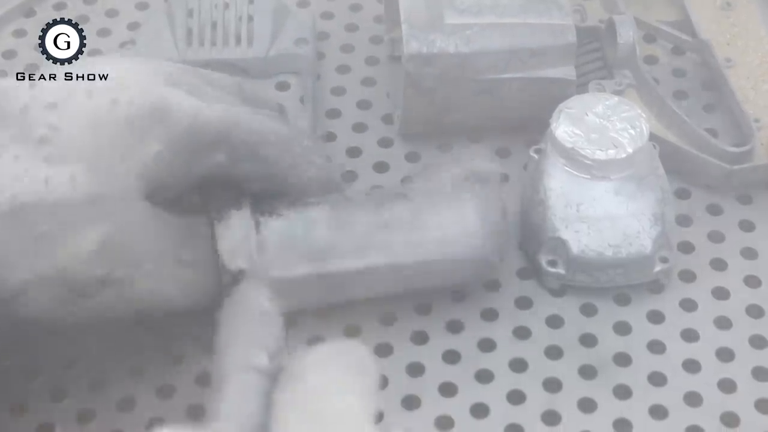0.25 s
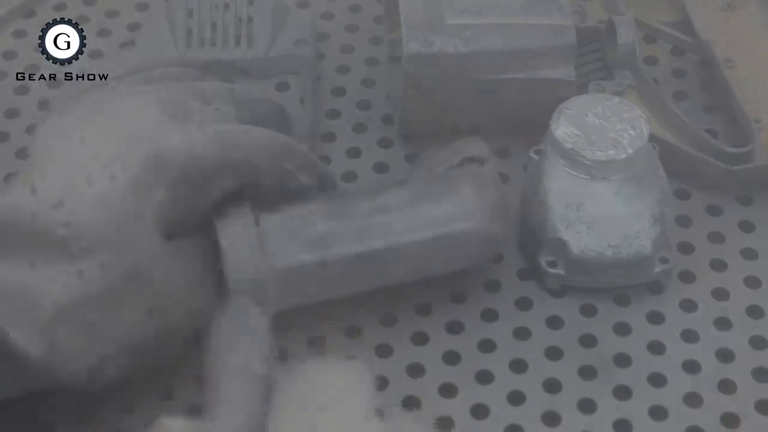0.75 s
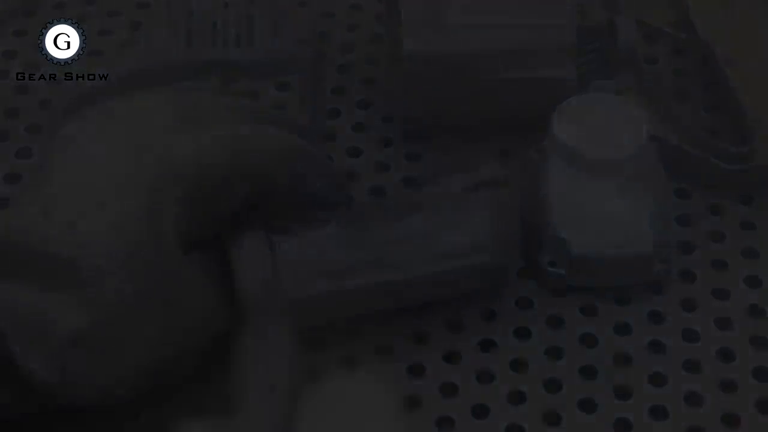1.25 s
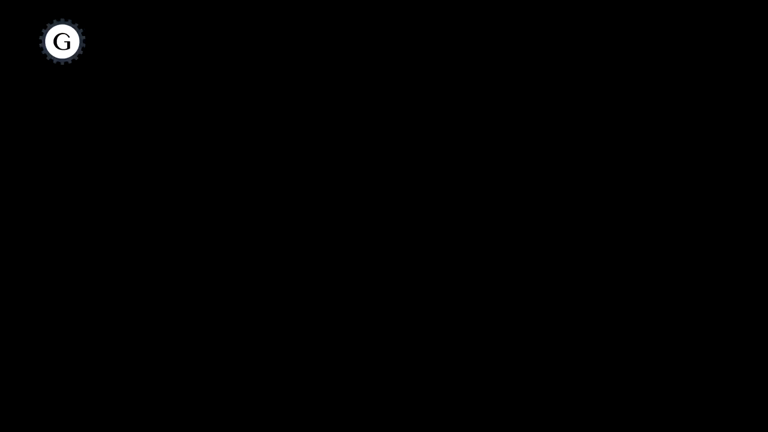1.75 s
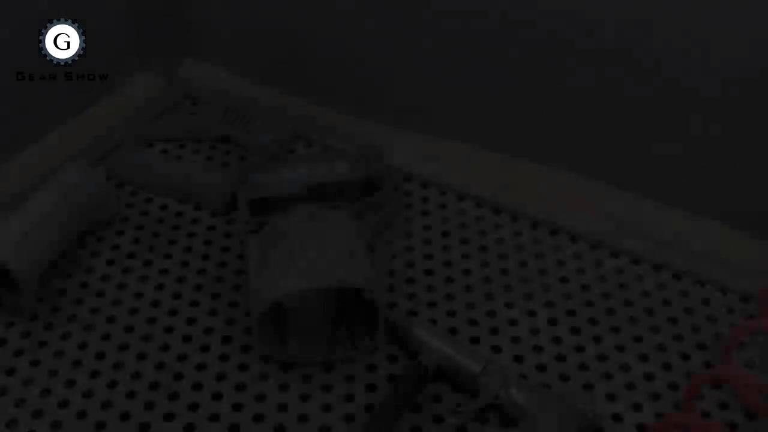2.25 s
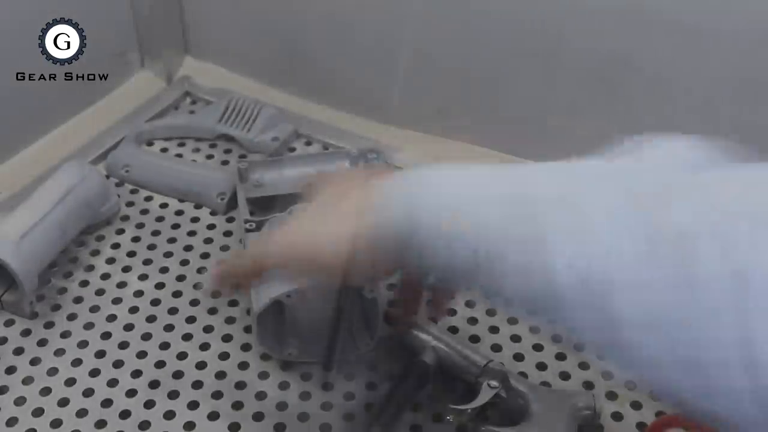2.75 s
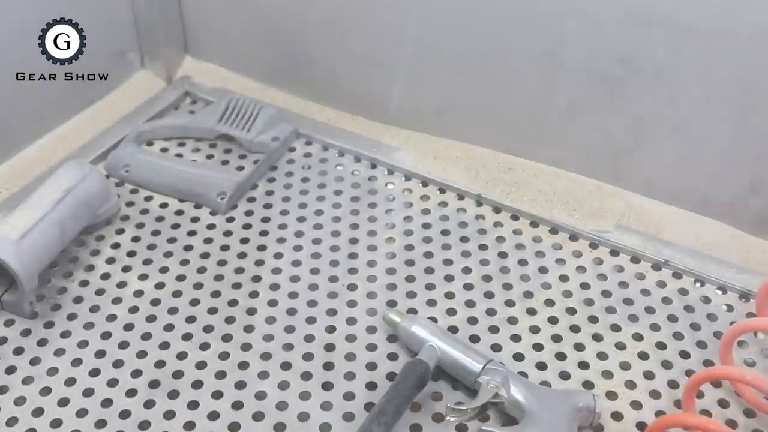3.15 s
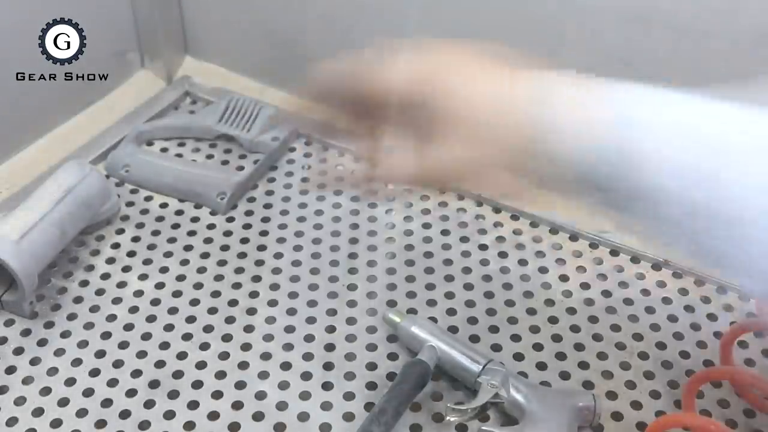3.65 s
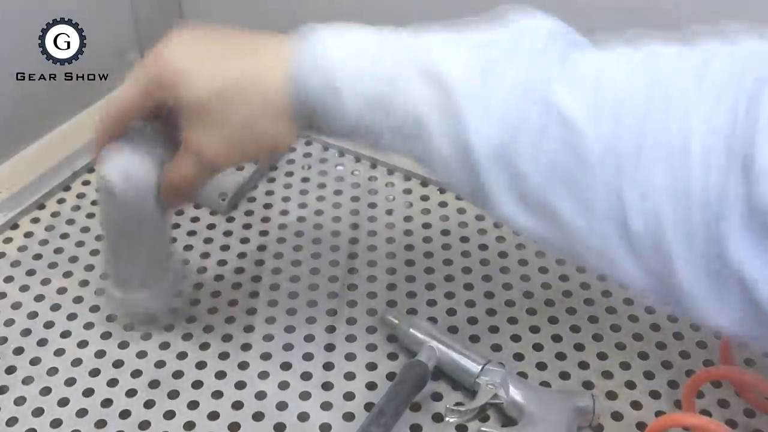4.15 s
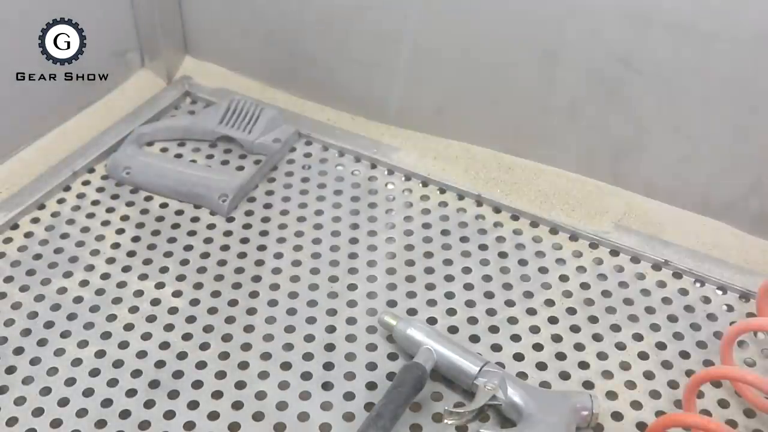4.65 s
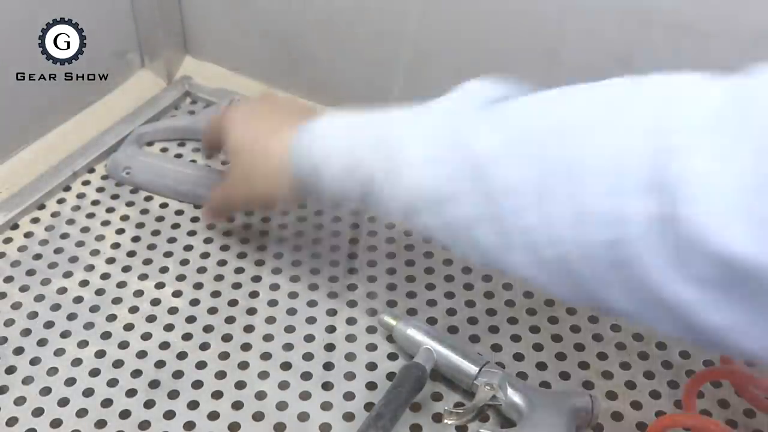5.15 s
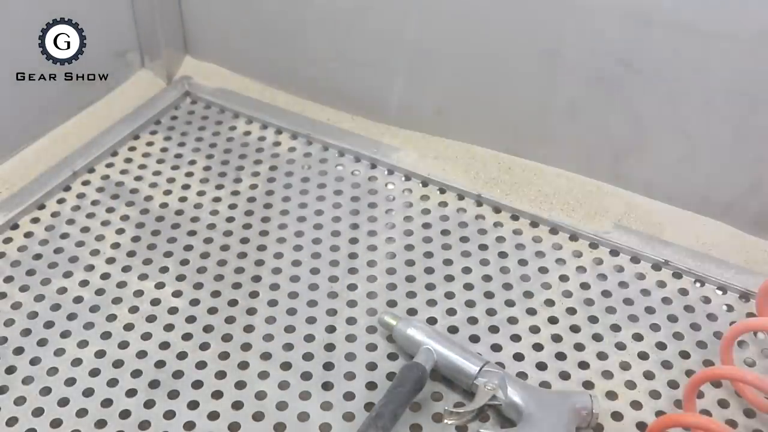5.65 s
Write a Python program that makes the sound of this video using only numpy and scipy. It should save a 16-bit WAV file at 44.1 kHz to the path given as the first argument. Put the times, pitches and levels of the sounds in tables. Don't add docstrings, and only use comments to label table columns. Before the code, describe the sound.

Inside a steel blasting cabinet, a turbulent air jet roars with bright hissing grit, wavering hollow hums and thin whistle spurts. It fades to near silence by two seconds. A quiet, hard-walled shop fades in, and metal parts clank off a perforated grate and onto a bench, one heavy knock early, a ringing tube later. One close microphone, identical in both channels.

```python
import sys
import numpy as np
from scipy import signal
from scipy.fft import rfft, irfft, next_fast_len
from scipy.io import wavfile
from scipy.ndimage import uniform_filter1d

SR = 44100
rng = np.random.default_rng(int(sys.argv[2]) if len(sys.argv) > 2 else 0)


def linear_from_db(decibels):
    return 10 ** (np.asarray(decibels, float) / 20)


def materialize(psi):
    bounded = np.clip(np.atleast_2d(psi).T, -1, 1)
    quanta = np.round(bounded * 32767).astype(np.int16)
    wavfile.write(sys.argv[1], SR, quanta)


N = 260615
SIZE = next_fast_len(N)
CUT_S = 1.917


def rms_one(x):
    return x / np.sqrt(np.mean(x ** 2) + 1e-20)


def in_time(rows):
    s, *columns = np.transpose(rows)
    return [np.interp(np.arange(N) / SR, s, c, left=-120, right=-120) for c in columns]


def at_hz(points, hz):
    table_hz, value = np.transpose(points)
    return np.interp(np.log(hz), np.log(table_hz), value)


def ramp(start_s, length_s):
    return np.clip((np.arange(N) / SR - start_s) / length_s, 0, 1)


def swells(rows):
    t = np.arange(N) / SR
    return np.max([db * np.exp(-(2 * (t - s) / length) ** 4) for s, length, db in rows], axis=0)


def drift(rate):
    r = np.exp(-80 * np.pi * rate / SR)
    slow = signal.lfilter([1], [1, -2 * r, r * r], rng.standard_normal(N // 40 + 2002))[2000:]
    return np.interp(np.arange(N) / 40, np.arange(len(slow)), rms_one(slow))


def band(x, low_hz, high_hz):
    return signal.sosfilt(signal.butter(3, [low_hz, min(high_hz, SR * .45)], "band", fs=SR, output="sos"), x)


def resonance(x, hz, width_hz):
    r = np.exp(-np.pi * width_hz / SR)
    return signal.lfilter([(1 - r * r) / 2, 0, (r * r - 1) / 2], [1, -2 * r * np.cos(2 * np.pi * hz / SR), r * r], x)


def coloured(x, spectrum):
    hz = np.maximum(np.fft.rfftfreq(SIZE, 1 / SR), 1)
    return rms_one(irfft(rfft(x, SIZE) * linear_from_db(at_hz(spectrum, hz)), SIZE)[:N])


def patchy(x, patchy_db, rate):
    together, spectrum = drift(rate / 4), rfft(x, SIZE)
    octave = np.log2(np.maximum(np.fft.rfftfreq(SIZE, 1 / SR), 1) / 22)
    out = np.zeros(N)
    for k in range(11):
        share = np.cos(np.pi / 2 * np.clip(octave - k, -1, 1)) ** 2
        out += irfft(spectrum * share, SIZE)[:N] * linear_from_db(patchy_db * (0.11 * together + drift(rate)))
    return rms_one(out)


def rattle(blows, spread_s):
    out, t = np.full(N + 4000, 1e-18), np.arange(4000) / SR
    draws = rng.standard_normal((len(blows), 4000)) ** 3
    for (s, db), draw in zip(blows, draws):
        spectrum = rfft(draw * t * np.exp(-t / spread_s))
        run = irfft(spectrum / np.abs(spectrum) ** .8)
        run = run * np.exp(-t / (4 * spread_s))
        start = round(s * SR)
        out[start:start + 4000] += linear_from_db(db) * run / np.sqrt(np.sum(run ** 2))
    return out[:N]


# t/s, level/dB
MACHINERY = [
    (1.9, -57),
    (2.8, -54),
    (3.3, -57.5),
    (4.6, -53),
    (5.2, -57),
    (5.92, -59),
]
# f/Hz, density/dB per Hz
SHOP_SPECTRUM = [(15, -29), (25, -10.5), (101, -19), (160, -6), (247, -2.5), (434, -3), (471, -8),
                 (510, -1.5), (829, -8.5), (948, -8), (1380, -10.5), (15600, -29)]


def shop():
    door_s, swing_s, door_loss_db = 2.22, .12, -11.5
    machinery_db, = in_time(MACHINERY)
    hiss_db = -56 + door_loss_db * (1 - ramp(door_s - swing_s / 2, swing_s))
    air = patchy(coloured(rng.standard_normal(N), SHOP_SPECTRUM), patchy_db=1.0, rate=8.8)
    hum = signal.lfilter([.15], [1, -.85], air)
    fade_in = ramp(CUT_S, 0.38) ** 0.73
    return fade_in * (linear_from_db(machinery_db) * hum + linear_from_db(hiss_db) * (air - hum))


# f/Hz, density/dB per Hz
ROAR_SPECTRUM = [(18, -78), (30, -57), (109, -30), (216, -4), (585, -3), (639, -3.5), (699, -1), (834, -5),
                 (953, -2.5), (1060, -3.5), (2020, -10), (2420, -13.5), (3300, -16), (6000, -42),
                 (7800, -50), (13200, -120)]
# f/Hz,
# width/Hz, level over the roar/dB
SHAKEN_PANELS = [(307, 32, -14), (1159, 3.5, -13.5), (2024, 28, -16.5), (2775, 83, -18), (3206, 350, -17),
                 (3830, 37, -25.5), (4910, 220, -24.5), (6510, 230, -28), (11800, 73, -40),
                 (13420, 60, -38)]


def roar():
    turbulence, push = rng.standard_normal((2, N))
    out = patchy(coloured(turbulence, ROAR_SPECTRUM), patchy_db=1.65, rate=1.5)
    for hz, width_hz, db in SHAKEN_PANELS:
        out = out + linear_from_db(db + 1.65 * drift(6.4)) * rms_one(resonance(push, hz, width_hz))
    return linear_from_db(-28) * out


def cabinet(x):
    t60_s, echo_db = 0.13, -3.0
    t = np.arange(SR // 5) / SR
    echoes = rng.standard_normal(len(t)) * linear_from_db(-60 * t / t60_s)
    echoes = echoes / np.sqrt(np.sum(echoes ** 2))
    return rms_one(x + linear_from_db(echo_db) * signal.fftconvolve(x, echoes)[:N])


# f/Hz, density/dB per Hz
GRIT_SPECTRUM = [(1470, -59), (2500, -7), (3170, -5), (3580, -6), (5670, -10), (8850, -8.5), (13700, -16),
                 (15600, -21.5)]


def grit(air):
    flows_s, rise_s, thin_db = 0.393, 0.037, -4.5
    struck = rng.random(N) < 9000 / SR
    hail = struck * linear_from_db(13.0 * np.minimum(rng.exponential(1, N), 4)) * rng.choice([-1, 1], N)
    hiss = coloured(rms_one(hail) * 0.21 + air, GRIT_SPECTRUM)
    hiss = cabinet(patchy(hiss, patchy_db=0.06, rate=6.4))
    return linear_from_db(-34 + thin_db * (1 - ramp(flows_s, rise_s))) * hiss


def air_column(white, hz, width_hz):
    tone = resonance(resonance(white, hz, width_hz), hz, width_hz)
    return rms_one(tone / uniform_filter1d(tone ** 2 + 1e-20, 600) ** .35)


# f/Hz, width/Hz, resting level/dB, share of the gain
AIR_COLUMNS = [
    (634, 10.2, -44.5, 0.8),
    (955, 44, -38, 0.24),
    (4470, 12, -51, 0.66),
    (8820, 60, -61, 1.2),
]
# middle t/s, length t/s, gain level/dB
MOUTH_SWEEPS = [
    (.09, .06, 12),
    (.22, 0.21, 15.5),
    (.34, 0.18, 18),
    (.51, .13, 17),
    (.69, 0.16, 4),
    (1.055, 0.056, 15),
    (1.14, 0.037, 14),
    (1.25, 0.11, 9.5),
    (1.55, 0.37, 13.5),
    (1.8, 0.26, 13),
]
# middle t/s, length t/s, gain level/dB
WHISTLE_SPURTS = [
    (.055, .08, 7.5),
    (.16, 0.1, 8),
    (.29, .11, 12),
    (.5, 0.087, 6),
    (.9, .12, 3),
    (1.3, .12, 9),
    (1.6, .12, 8),
]


def blown_air(air):
    hum_db, whistle_db = swells(MOUTH_SWEEPS), swells(WHISTLE_SPURTS)
    gains_db = [hum_db, hum_db, whistle_db, whistle_db]
    return sum(linear_from_db(db + share * gain_db) * air_column(air, hz, width_hz)
               for gain_db, (hz, width_hz, db, share) in zip(gains_db, AIR_COLUMNS))


def jet():
    air = rng.standard_normal(N)
    fade_out = ramp(CUT_S, -1.13) ** 0.89
    return fade_out * (roar() + grit(air) + blown_air(air))


def thump():
    t = np.maximum(np.arange(N) / SR - 2.405, 0)
    return linear_from_db(-44) * np.sin(2 * np.pi * 35 * t) * np.exp(-t / .015)


# t/s, first level/dB, first ring f/Hz, second level/dB, second ring f/Hz
GRIT_TICKS = [(2.848, -53, 6540, -49.5, 3000), (2.945, -63, 8000, -64, 13170),
              (3.17, -45, 14500, -56, 8000), (3.178, -53.5, 2790, -69, 5640), (3.58, -66, 8000, -55, 2300),
              (3.665, -62, 5000, -52, 2500), (3.776, -50, 8400, -50, 3500),
              (4.173, -45.5, 16000, -59, 8300), (4.3, -50, 5800, -58, 13500), (4.61, -58, 7960, -57, 4900),
              (4.974, -67, 12000, -62, 7400), (5.538, -53, 13300, -61, 8000), (5.605, -66, 7000, -55, 3550)]


def ticks():
    out = np.zeros(N)
    for s, db, hz, second_db, second_hz in GRIT_TICKS:
        run = rattle([(s - .002, 36)], spread_s=0.0068)
        out += linear_from_db(db) * resonance(run, hz, 0.37 * hz)
        out += linear_from_db(second_db) * resonance(run, second_hz, 0.27 * second_hz)
    return out


# t/s, peak level/dB
BENCH_SNAPS = [
    (4.767, -25),
    (4.778, -16),
    (5.8922, -13),
]


def snaps():
    clicks = np.full(N, 1e-18)
    for s, db in BENCH_SNAPS:
        clicks[round(s * SR)] = linear_from_db(db + 15.5)
    return resonance(clicks, 2600, 1700)


# t/s, strength level/dB, weight on the grate level/dB, hardness level/dB
METAL_KNOCKS = [(2.173, -48.5, 11.5, -10), (2.209, -37, 6.5, -9.5), (2.229, -52, -3, 4.5),
                (2.397, -27, 5, 4.5), (2.41, -8.5, -12, -6), (2.965, -45, 2.5, -13), (3.993, -41, 12, -18),
                (4.06, -39.5, 4.5, -16.5), (4.18, -24, 4.5, -14.5), (4.257, -23, 5.5, -17),
                (4.329, -26, -3.5, -15.5), (4.767, -24.5, -43, -26), (4.778, -29, -23, -11),
                (5.044, -47.5, 1, -11), (5.099, -48, 2.5, -11), (5.315, -40, 9.5, -8.5),
                (5.359, -40, -16, -12), (5.893, -26.5, -29, -15)]
IMPACT_EDGES_HZ = [170, 800, 2500, 4800, 17000]


def knocks():
    s, db, weight_db, hard_db = np.transpose(METAL_KNOCKS)
    crack_db = db - 0.5 + 0.033 * hard_db
    levels_db = [db + weight_db, db, crack_db, db + hard_db]
    spreads_s, lifts_db = [0.0123, 0.0054, 0.0048, 0.0093], [35.1, 32.3, 28.4, 34.3]
    out = np.zeros(N)
    for k, (low_hz, high_hz) in enumerate(zip(IMPACT_EDGES_HZ, IMPACT_EDGES_HZ[1:])):
        blows = np.c_[s - .003, levels_db[k] + lifts_db[k]]
        out += band(rattle(blows, spreads_s[k]), low_hz, high_hz)
    return signal.sosfilt(signal.butter(1, 8000, fs=SR, output="sos"), out)


# f/Hz, T60/s
SHOP_T60 = [(150, 0.78), (400, 0.53), (1040, 0.5), (2760, 0.55), (7280, 0.37), (11000, 0.37), (16000, 0.1)]


def room(noisy):
    direct_db, build_s = -7, 0.0028
    t, edges = np.arange(SR // 2) / SR, 80 * 2 ** np.arange(0, 8.1, .5)
    white = rng.standard_normal((2, len(t)))
    tail = np.zeros(len(t))
    for k, (low_hz, high_hz) in enumerate(zip(edges, edges[1:])):
        t60_s = 0.83 * at_hz(SHOP_T60, np.sqrt(low_hz * high_hz))
        tail += band(white[k % 2], low_hz, high_hz) * linear_from_db(-60 * t / t60_s)
    tail = tail * (1 - np.exp(-t / build_s))
    tail = tail / np.sqrt(np.sum(tail ** 2))
    return linear_from_db(direct_db) * noisy + signal.fftconvolve(noisy, tail)[:N]


def part(modes, blows, swell_s, waver):
    at, out = [round(s * SR) for s, db in blows], np.zeros(N)
    start, swell = at[0], np.exp(-1 / (swell_s * SR))
    t, blow_db = np.arange(N - start) / SR, np.array(blows)[:, 1]
    softness_db = blow_db.max() - blow_db
    for hz, db, t60 in modes:
        dulling_db = 0.2 * softness_db * max(np.log2(hz / 1500), 0)
        energy = np.full(N, 1e-30)
        energy[at] = linear_from_db(2 * (blow_db + db - dulling_db + rng.normal(0, 1.5, len(at))))
        swell_and_decay = np.convolve([1, -swell], [1, -linear_from_db(-120 / (t60 * SR))])
        energy = signal.lfilter([1 - swell], swell_and_decay, energy[start:])
        wander = waver * drift(21.2)[start:]
        tone = np.sin(2 * np.pi * (hz * t + rng.random()) + wander)
        out[start:] += np.sqrt(energy) * linear_from_db(5.1 * wander[::-1]) * tone
    return out


# t/s, level/dB
GRATE_MODES = [(222.2, -4.5, 0.26), (272.5, -6.5, 0.44), (319.4, 3, 0.4), (405, -17, 0.025),
               (485, -1.5, 0.41), (506, -5, 0.15), (592, -20.5, 0.29), (678, 1.5, 0.1)]
GRATE_HITS = [(2.226, -39.5), (2.29, -59), (2.411, -30.5), (2.965, -49.5), (4.0, -62), (4.062, -41),
              (4.193, -33), (4.26, -33.5), (4.334, -35), (5.311, -47), (5.37, -54)]
LUG_MODES = [(780, 0, 0.093), (1000, 6, 0.063), (1138, 0, .08), (2900, -8, .06)]
LUG_HITS = [
    (2.176, -43.5),
    (2.85, -69),
    (3.99, -51),
]
HOUSING_MODES = [(214, -17, 0.71), (260, -7.5, 0.43), (1710, -10.5, 0.47), (579, -6.5, 0.37),
                 (1412, -3, 0.29), (1910, -14, 0.38), (2185, -8.5, 0.36), (5350, -10, 0.39),
                 (5800, -17.5, 0.38), (6360, -22, 0.187), (7070, -18, 0.3), (8080, -8, 0.17),
                 (9905, -19, .16)]
HOUSING_HITS = [
    (2.41, -16),
]
BRACKET_MODES = [(655, -11.5, 0.203), (1400, -4, 0.5), (2220, 3, 0.039), (3000, -4, 0.17), (3500, 3, .15),
                 (3910, 3, 0.18), (5230, -2, 0.061), (7540, -2, 0.15), (11800, -28, 0.1)]
BRACKET_HITS = [
    (2.962, -54.5),
    (2.99, -51.5),
    (5.892, -35),
]
SLEEVE_MODES = [(3060, 1, 0.23), (3520, 0.5, 0.2), (4430, -5, 0.18), (6080, -6, .15), (7040, -14, 0.27),
                (7470, -17, .22), (7955, -12, 0.41), (8270, -11, .25), (8500, -6.5, 0.22),
                (9060, -12, 0.13), (10600, -24, .17), (11620, -18, .14), (12350, -18, .14)]
SLEEVE_HITS = [
    (4.201, -41),
    (4.262, -43),
    (4.33, -40),
    (4.35, -45),
]
HANDLE_MODES = [(3004, -4.5, 0.47), (3450, -0.5, 0.16), (4390, -15, 0.2), (5160, -15, 0.24),
                (5959, -25, 0.29), (6900, -12, 0.29), (7500, -20, .27), (7838, -14, 0.28),
                (8900, -11.5, 0.34), (9800, -14, 0.29), (11900, -13, .15), (12830, -16, .19)]
HANDLE_HITS = [
    (5.312, -50),
    (5.335, -51),
    (5.36, -43),
    (5.385, -45.5),
]
TUBE_MODES = [(920, -24, 0.12), (1304, -33, 0.15), (1421, 4, 0.22), (1530, -28, 0.21), (1652, -1.5, 0.3),
              (1860, -17, .13), (2020, -12, .13), (2210, -11, 0.078), (2250, -19, .15), (2650, -15, 0.11),
              (2770, -6.5, 0.12), (3140, -12.5, 0.32), (3290, -0.5, 0.075), (3420, -7, 0.13),
              (3566, -10, 0.31), (3600, -19, 0.4), (3780, -18.5, 0.47), (4070, -12, 0.1), (4400, -33, 0.11),
              (5329, -17, .21), (5352, -18, .21), (5545, -26, .25), (6050, -24, 0.19), (7660, -21, 0.28),
              (8720, -27, 0.17), (9749, -31, .12), (10460, -25, 0.14)]
TUBE_HITS = [(4.766, -28.5), (4.776, -21.5), (4.79, -22), (4.815, -25.5), (4.84, -28), (4.865, -32),
             (4.935, -43), (4.959, -46.5), (5.005, -51), (5.075, -49.5), (5.115, -50), (5.16, -56.5),
             (5.49, -57), (5.64, -63)]


def ringing_parts():
    out = part(GRATE_MODES, GRATE_HITS, swell_s=0.0021, waver=0.79)
    out += part(LUG_MODES, LUG_HITS, swell_s=0.0017, waver=.6)
    out += part(HOUSING_MODES, HOUSING_HITS, swell_s=0.0039, waver=0.81)
    out += part(BRACKET_MODES, BRACKET_HITS, swell_s=0.0012, waver=0.29)
    out += part(SLEEVE_MODES, SLEEVE_HITS, swell_s=0.0094, waver=1.0)
    out += part(HANDLE_MODES, HANDLE_HITS, swell_s=0.0037, waver=0.98)
    out += part(TUBE_MODES, TUBE_HITS, swell_s=0.0042, waver=0.92)
    return out


def scene():
    mono = shop() + jet() + thump() + snaps() + room(knocks() + ticks()) + ringing_parts()
    return np.array([mono, mono])


def roll_off(x):
    return signal.sosfilt(signal.butter(12, 15990, fs=SR, output="sos"), x)


def record(dry):
    rounded = .7 * np.tanh(dry / .7)
    mix = signal.sosfilt(signal.ellip(10, .5, 70, 15800, fs=SR, output="sos"), rounded)
    return roll_off(mix)


dry = scene()
out = record(dry)
materialize(out)
```